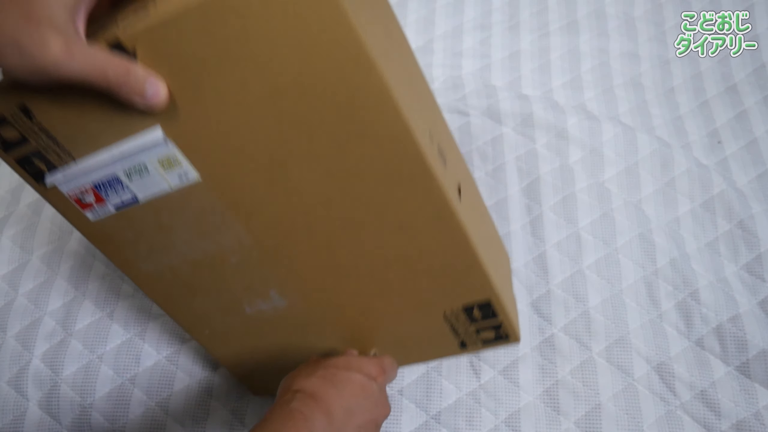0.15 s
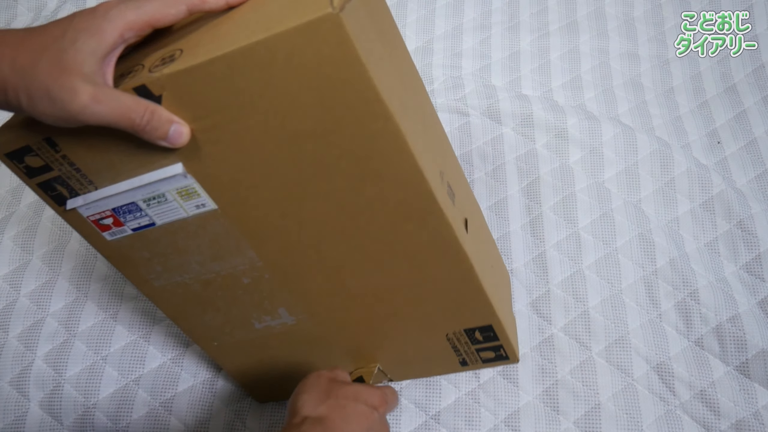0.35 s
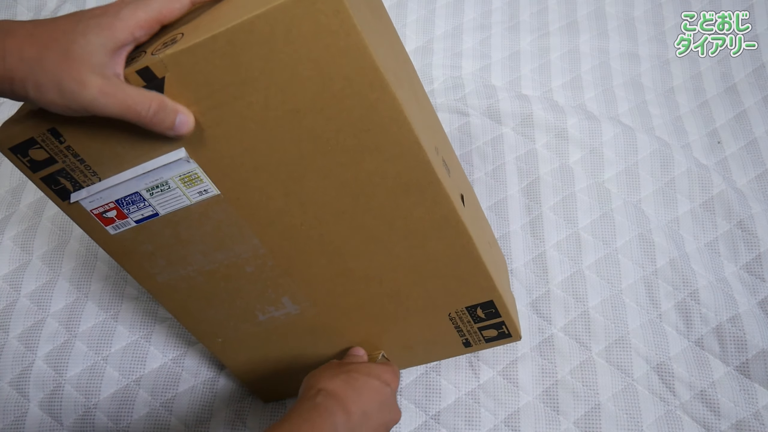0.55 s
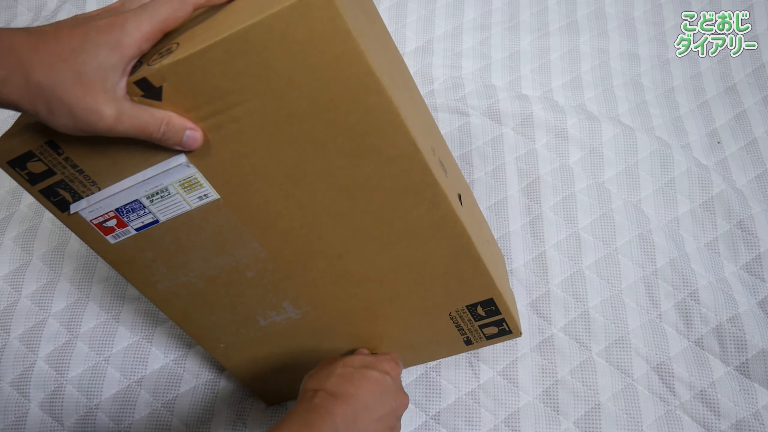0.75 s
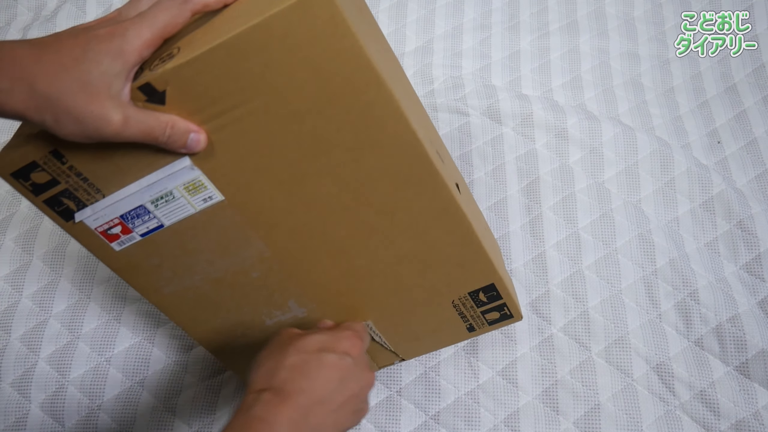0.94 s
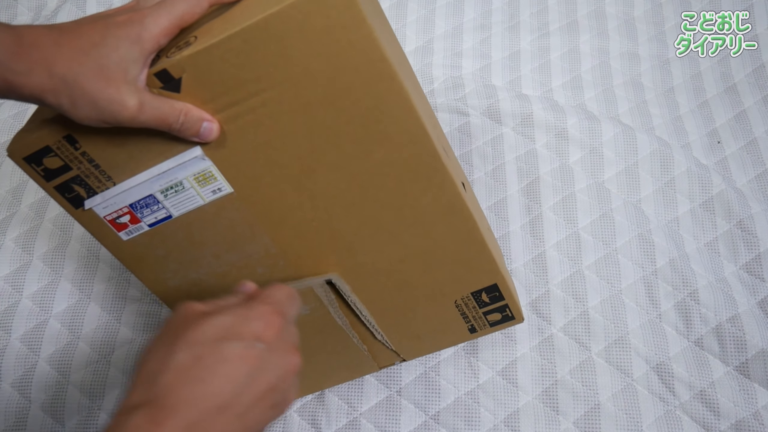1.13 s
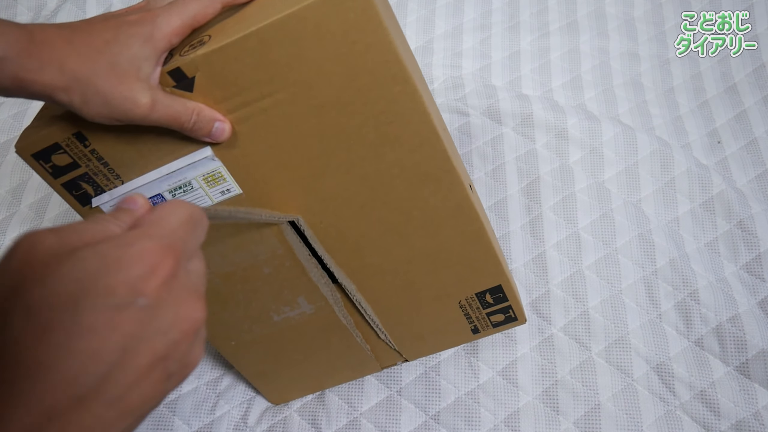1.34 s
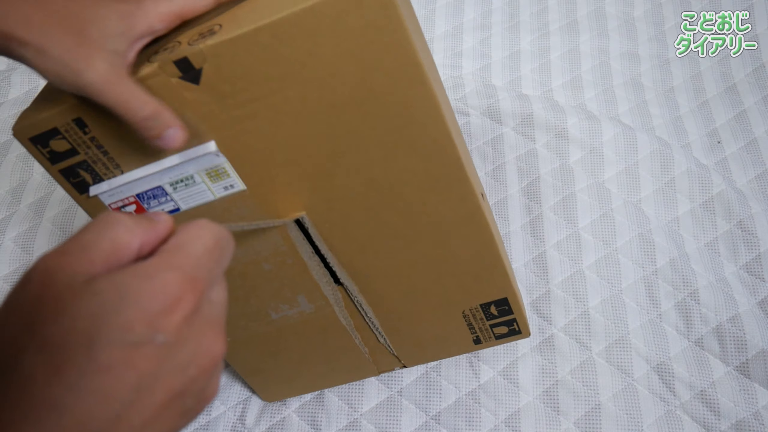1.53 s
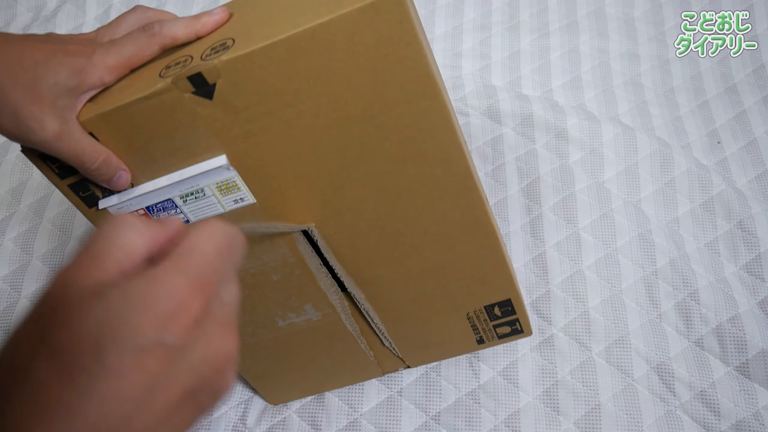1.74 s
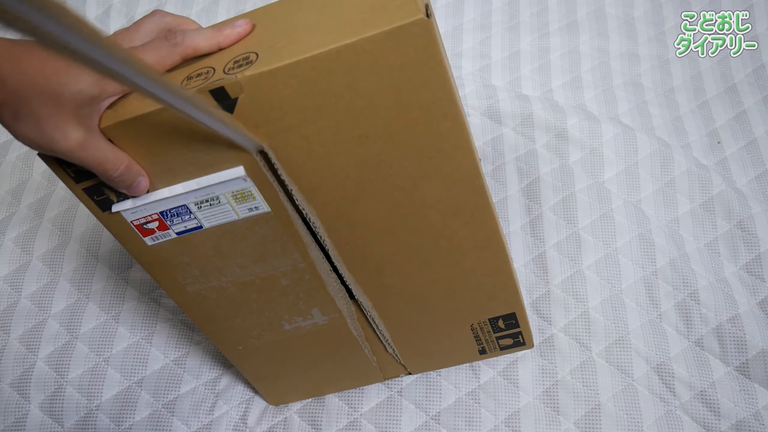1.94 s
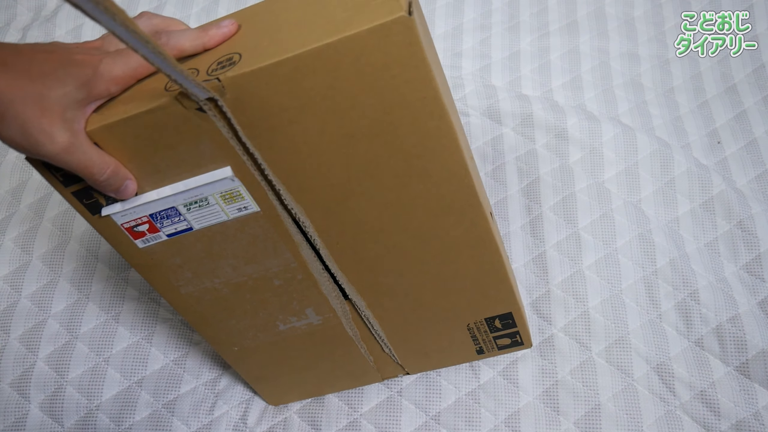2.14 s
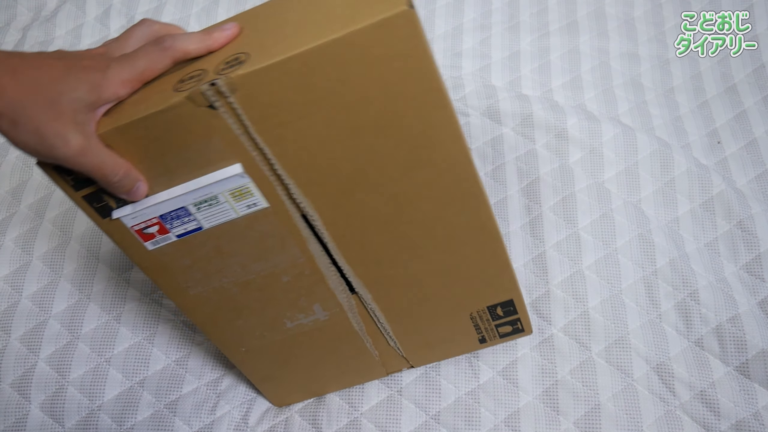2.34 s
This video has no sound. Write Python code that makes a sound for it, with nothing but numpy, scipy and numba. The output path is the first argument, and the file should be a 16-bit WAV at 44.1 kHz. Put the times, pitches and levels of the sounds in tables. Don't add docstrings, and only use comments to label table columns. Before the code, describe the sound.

Two loud ripping pulls on a cardboard box's tear strip, boomy and crackling, then a small snap

```python
import sys
import numpy as np
from scipy import signal
from scipy.fft import rfft, irfft
from scipy.io import wavfile
from scipy.ndimage import uniform_filter1d
from numba import njit

SR = 44100
rng = np.random.default_rng(int(sys.argv[2]) if len(sys.argv) > 2 else 0)


def dump_mix(stems):
    frames = np.atleast_2d(stems).T
    limited = np.clip(frames, -1, 1)
    pcm = np.round(limited * 32767).astype(np.int16)
    wavfile.write(sys.argv[1], SR, pcm)


def invert_db(x):
    u = np.asarray(x, float) / 20
    return 10 ** u


N = 109323

# f/Hz, level/dB per Hz
AIR = [(18, -20), (30, -2), (227, -27.5), (311, -27.5), (461, -23), (822, -45), (1010, -31.5), (1130, -37),
       (16000, -48)]
AIR_DB = -57.5

MOTOR_PER_S, MOTOR_START_S, MOTOR_STOP_S = 59.94, 0.0115, 0.6
MOTOR_HZ, MOTOR_DB, MOTOR_BODY_DB = 2000, -46, -50.5

# t/s, knock level/dB, brightness/dB
TAPS = [(0.033, -43, -19), (0.112, -47, -12), (0.163, -31, -14), (0.204, -30.5, -14), (0.334, -34.5, -4.5),
        (0.397, -35, 5), (0.404, -32, -2), (0.434, -37, -8.5), (0.529, -21, -7), (0.611, -33.5, -19.5),
        (0.624, -34, -8), (0.632, -27.5, -2), (0.765, -28, 11), (1.506, -43.5, -14), (2.285, -37, -4),
        (2.302, -28, 10.5)]
# t/s, level/dB, share of the box body/dB
SLIDE = [(0, -67.5, 8.5), (.13, -60.5, 2.5), (.2, -56.5, 9), (.27, -54.5, 3.5), (.3, -62.5, -4),
         (.42, -60, 3), (.5, -59, 2.5), (.56, -54, 5), (.66, -47.5, -4.5), (.7, -60.5, 8.5),
         (.76, -46, 1.5), (1.49, -69, 12), (1.53, -56, 1), (1.62, -58.5, -5.5), (1.7, -44.5, -10.5),
         (1.76, -58.5, 5), (2.22, -82, -4), (2.25, -57, -5.5), (2.47, -78.5, -8)]
# f/Hz, level/dB, t60/s
CORNER = [(367, -7, 0.05), (501, -9, 0.11), (589, 2.5, 0.043), (665, 1.5, 0.035), (782, -0.5, 0.014),
          (1177, 1.5, 0.012), (1444, -6, 0.0094)]
# f/Hz, level/dB per Hz
RUB = [(590, -39), (1000, 0.5), (1430, -15.5), (1960, -7), (6110, -7.5), (7790, -1), (16000, -9)]
TAP_DB, KNOCK_S, TICK_S, TICK_DB = 3.5, 0.00082, 0.0018, -3

# t/s, box drumming level/dB, fibre crackle level/dB, wall rattle level/dB
PULLS = [
    [(.66, -67, -58, 4), (.76, -46.5, -48.5, 0), (.767, -40.5, -36.5, 6.5), (.832, -44, -39.5, -8),
     (.843, -24, -31, -12), (1.1, -20, -32.5, -11.5), (1.25, -19.5, -41, -15), (1.34, -18, -43, -13),
     (1.405, -18, -44, -24), (1.45, -57, -47.5, 0)],
    [(1.8, -64, -57, -12), (1.815, -18, -34.5, -14), (1.85, -17, -35.5, -13), (1.92, -17.5, -36, -12.5),
     (2.0, -16, -41, -22), (2.06, -22, -39, -20), (2.09, -19.5, -35, -12.5), (2.15, -36, -40, -7),
     (2.19, -46, -71, -27)],
    [(2.276, -44.5, -46.5, -28), (2.288, -32.5, -32, 0), (2.308, -27, -26.5, -2), (2.33, -38, -46.5, -14),
     (2.385, -68, -63.5, -9)],
]
# t/s, thump level/dB
FLUTES = [(0.864, -7.5), (0.913, -4), (0.959, -7.5), (0.993, -5), (1.036, -11.5), (1.064, -7), (1.095, -13),
          (1.119, -2.5), (1.163, -1.5), (1.21, -1.5), (1.224, -3), (1.262, -0.5), (1.303, -8),
          (1.315, -1.5), (1.349, -3.5), (1.367, -4.5), (1.814, -5.5), (1.836, -0.5), (1.862, -0.5),
          (1.885, -21), (1.902, -4.5), (1.927, -32), (1.964, -10.5), (1.982, -18), (2.008, -9.5),
          (2.032, -12), (2.069, -7), (2.092, -12), (2.138, -38), (2.295, -19.5)]
# t/s, thump level/dB
BUMPS = [
    (.638, -30.5),
    (0.762, -24.5),
    (1.436, -30),
    (1.524, -33.5),
    (1.582, -35.5),
    (1.742, -28.5),
    (2.15, -26.5),
    (2.2, -35.5),
    (2.288, -23.5),
]
# t/s, lid pitch f/Hz, boom of the box air level/dB
SLIT = [(.6, 200, -1), (.86, 194, -2.5), (1.0, 196.6, -2), (1.079, 188, -4), (1.13, 208, -3),
        (1.22, 198, -9.5), (1.27, 213.7, -15), (1.33, 234.3, -22), (1.4, 199.3, -10), (1.81, 178, -5.5),
        (1.845, 203.3, -19), (1.91, 233.7, -18.5), (1.95, 223.6, -16.5), (2.0, 191, -21), (2.04, 212, -17),
        (2.08, 221.5, -10.5), (2.16, 194.4, -1), (2.3, 198.4, -9)]
# f/Hz, level/dB, t60/s
BOX_AIR = [(73.7, -2.5, 0.31), (114, -7, 0.19), (139, 7, 0.12), (194, -10.5, 0.21)]
# f/Hz, level/dB, t60/s
LID = [(209.5, 1, 0.12), (246.5, -10.5, 0.14), (295.7, -22, 0.17)]
# f/Hz, level/dB, t60/s
WALLS = [(489.6, -1, 0.081), (534, -7, 0.047), (600, -5.5, 0.042), (688, -7, 0.045), (805, -4.5, 0.022),
         (1054, -4, 0.03), (1190, -5, 0.026), (1600, -4, 0.0071)]
# t/s, level/dB
SLAPS = [(0.775, -23), (0.866, -22), (0.886, -30), (0.916, -24), (0.929, -28), (0.948, -29), (0.962, -25.5),
         (0.984, -25), (1.028, -32), (1.058, -34), (1.064, -26.5), (1.093, -22.5), (1.115, -17),
         (1.139, -29), (1.149, -29), (1.158, -26), (1.192, -39), (1.228, -27.5), (1.272, -25), (1.297, -45),
         (1.318, -21), (1.348, -17), (1.366, -26), (1.4, -32), (1.815, -29.5), (1.84, -18.5), (1.893, -29),
         (1.92, -24), (1.957, -30), (1.986, -30), (2.003, -37), (2.013, -33), (2.032, -30), (2.039, -39.5),
         (2.059, -24.5), (2.087, -29), (2.11, -33), (2.125, -46), (2.132, -31), (2.305, -27)]
LID_REST_HZ, LID_LOW_HZ, SLACK_DAMPING = 210, 104, 3.5
PUSH_S, THUMP_DB = 0.0041, -3.5
SMALL_PER_S, SMALL_SCATTER_DB, SMALL_PUSH_S, SMALL_DB = 670, 4.5, 0.0021, -6
RATTLE_PER_S, WALL_PATCHY_DB, WALL_DRIFT = 310, 2.0, 0.039
SLAP_DB, SLAP_S = -7.5, 0.00049

# t/s, peak level/dB
TICKS = [(0.8521, -17.5), (0.8651, -21), (0.9031, -15), (0.9167, -22.5), (0.927, -23), (0.9499, -18.5),
         (0.9739, -25), (0.9878, -19.5), (0.9965, -28), (1.0277, -18), (1.065, -18), (1.0939, -27),
         (1.1087, -20), (1.1395, -28), (1.1603, -27), (1.168, -31.5), (1.183, -28), (1.1956, -30),
         (1.2094, -32), (1.2235, -31.5), (1.2506, -31), (1.2617, -35), (1.2664, -37.5), (1.291, -34),
         (1.3076, -35), (1.3166, -37), (1.3261, -33), (1.3358, -33), (1.343, -37), (1.3516, -29.5),
         (1.3629, -33.5), (1.3754, -30.5), (1.382, -42), (1.4008, -33.5), (1.4188, -41), (1.8161, -19),
         (1.8377, -20.5), (1.858, -29), (1.867, -30), (1.8903, -40), (1.8984, -29), (1.921, -25),
         (1.9414, -35.5), (1.9656, -28.5), (1.9752, -28), (1.988, -31), (2.0033, -39), (2.0157, -33),
         (2.0258, -40), (2.0328, -43), (2.0455, -42), (2.0795, -28), (2.0883, -32), (2.0982, -30.5),
         (2.111, -34), (2.132, -33), (2.2895, -28), (2.307, -27.5)]
# t/s, dull part level/dB, bright part level/dB
SNAPS = [
    (0.6118, -23.5, -36),
    (0.635, -20.5, -33),
    (0.7627, -23.5, -38),
    (1.7933, -30.5, -40),
    (2.241, -56.5, -39),
    (2.2571, -42, -24.5),
    (2.3715, -43.5, -52),
]
# f/Hz, level/dB per Hz
FIBRE = [(820, -13), (1400, -3), (2300, -6.5), (4140, -4), (7020, -3.5), (8770, -0.5), (10600, -4.5),
         (12500, -3.5), (15800, -12.5)]
FIBRES_PER_S, FIBRE_SCATTER_DB, FIBRE_DB, FLICKER_DB = 11000, 2.5, -2, 2
PATCHY_DB, FIBRE_LOW_DB_OCT = 2.2, 3.0
PART_S, PART_TAIL_S, PART_DB = 0.0018, 0.0016, -2.0
SKIRT_S, SKIRT_DB = 0.0098, 38.5
SNAP_S, SNAP_RISE_S, SNAP_DB, BRIGHT_HZ = 0.0028, 0.0016, -10, 8000

ROOM_T60_S, ROOM_DB = 0.11, -10.5
LAG_S, LEFT_DB, LEFT_TOP_DB = -1.5e-5, 0.8, -2.5
SPREAD_DB, WIDE_HZ, RUMBLE_SIDE_DB = -3, 2600, -10.5
MIC_LOW_HZ, TOP_HZ = 59, 15800


def unit(x):
    return x / np.sqrt(np.mean(x ** 2))


def rms(x):
    return np.sqrt(np.mean(x ** 2))


def track(rows, col, off=None):
    rows = np.array(rows)
    return np.interp(np.arange(N) / SR, rows[:, 0], rows[:, col], left=off, right=off)


def curve(rows, col):
    return invert_db(track(rows, col, -120.0))


def colour(x, points, low_db_oct=-2.0):
    f = np.maximum(np.fft.rfftfreq(N, 1 / SR), 1)
    hz, db = np.array(points).T
    octaves_below = np.minimum(np.log2(f / hz[0]), 0)
    gain = invert_db(np.interp(np.log(f), np.log(hz), db) + low_db_oct * octaves_below)
    return irfft(rfft(x) * unit(gain), N)


def butter(x, order, hz, kind):
    return signal.sosfilt(signal.butter(order, hz, kind, fs=SR, output="sos"), x)


def ring(x, modes):
    t = np.arange(SR // 2) / SR
    h = np.zeros(len(t))
    for hz, db, t60 in modes:
        h += invert_db(db) * np.exp(-np.log(1000) * t / t60) * np.sin(2 * np.pi * hz * t)
    return signal.fftconvolve(x, h / np.abs(h).max())[:N]


@njit
def bend(x, hz, keep):
    y, z = np.empty(len(x)), 0j
    for i in range(len(x)):
        z = z * keep[i] * np.exp(2j * np.pi * hz[i] / SR) + x[i]
        y[i] = z.imag
    return y


def decay(t60):
    return np.exp(-np.log(1000) / (t60 * SR))


def spikes(times, dbs):
    x = np.zeros(N)
    at = np.clip((np.asarray(times) * SR).astype(int), 0, N - 1)
    np.add.at(x, at, invert_db(np.asarray(dbs)))
    return x


def soften(x, seconds):
    w = np.sin(np.pi * np.clip(np.arange(800) / SR / seconds, 0, 1)) ** 2
    return np.convolve(x, w / w.sum())[:N]


def burst(x, seconds):
    return signal.lfilter([1], [1, -np.exp(-1 / (seconds * SR))], x)


def crackle(per_s, scatter_db):
    chance, sign, draw = rng.random((3, N))
    size = np.minimum(-np.log(1 - draw), 4)
    return unit((chance < per_s / SR) * np.sign(sign - 0.5) * invert_db(scatter_db * size))


def walk(rate):
    k = int(SR / rate)
    held = np.repeat(rng.standard_normal(N // k + 1), k)
    return unit(uniform_filter1d(held, k)[:N])


def room_air():
    return [invert_db(AIR_DB) * colour(rng.standard_normal(N), AIR) for _ in range(2)]


def room(near):
    t = np.arange(SR // 2) / SR
    tails = rng.standard_normal((2, len(t))) * invert_db(-60 * t / ROOM_T60_S) * (t > 0.004)
    bright = butter(near, 1, 500, "high")
    wet = [signal.fftconvolve(bright, h / np.sqrt(np.sum(h ** 2)))[:N] for h in tails]
    return invert_db(ROOM_DB) * np.array(wet)


def motor():
    t = np.arange(MOTOR_START_S, MOTOR_STOP_S, 1 / MOTOR_PER_S)
    weak_db = -7.0 * (np.arange(len(t)) % 2)
    steps = spikes(t, 2.5 * rng.standard_normal(len(t)) + weak_db)
    shell = ring(soften(steps, 0.00057), [(MOTOR_HZ, 0, 0.025)])
    shell = butter(shell, 2, [1700, 2300], "band")
    body = ring(soften(steps, 0.00093), [(615, 0, 0.053)])
    return shell * invert_db(MOTOR_DB) + body * invert_db(MOTOR_BODY_DB)


def fingers():
    t, db, bright_db = np.array(TAPS).T
    hits = spikes(t, db + TAP_DB)
    scuff = burst(hits, 0.009) * rng.standard_normal(N) * invert_db(-25.5)
    knock = butter(ring(soften(hits, KNOCK_S) + scuff, CORNER), 2, 400, "high")

    slide = curve(SLIDE, 1) * invert_db(1.0 * walk(41.3))
    stir = ring(crackle(900, 1.0), CORNER) + invert_db(-10.0) * ring(crackle(710, 5.0), LID)
    stir = unit(stir) * slide * curve(SLIDE, 2)

    tick_env = burst(spikes(t, db + bright_db + TICK_DB), TICK_S)
    surface = []
    for _ in range(2):
        tick = colour(tick_env * rng.standard_normal(N), FIBRE, low_db_oct=7.0)
        rub = slide * colour(crackle(11000, 1.7), RUB, low_db_oct=7.5)
        surface.append(tick + rub)
    return knock + stir, surface


def walls():
    shake = sum(curve(p, 1) * curve(p, 3) for p in PULLS) / np.sqrt(SR / 100)
    t, level_db = np.array(SLAPS).T
    out = np.zeros(N)
    for hz, db, t60 in WALLS:
        rattle = shake * invert_db(WALL_PATCHY_DB * walk(14)) * crackle(RATTLE_PER_S, 4.7)
        share_db = 4.2 * rng.standard_normal(len(t))
        slap = soften(spikes(t, level_db + SLAP_DB + share_db), SLAP_S)
        pitch = hz * (1 + WALL_DRIFT * walk(7))
        out += invert_db(db) * bend(rattle + slap, pitch, np.full(N, decay(t60)))
    return out


def lid(x):
    pitch = track(SLIT, 1) / LID_REST_HZ
    out = np.zeros(N)
    for hz, db, t60 in LID:
        out += invert_db(db) * bend(x, hz * pitch, decay(t60 * pitch ** SLACK_DAMPING))
    return butter(out, 2, LID_LOW_HZ, "high")


def box():
    boom = invert_db(track(SLIT, 2))

    def body(x):
        return ring(x * boom, BOX_AIR) + lid(x)

    small = soften(crackle(SMALL_PER_S, SMALL_SCATTER_DB), SMALL_PUSH_S)
    drum = small / rms(body(small)) * invert_db(SMALL_DB) * sum(curve(p, 1) for p in PULLS)
    thumps = invert_db(THUMP_DB) * soften(spikes(*np.array(FLUTES + BUMPS).T), PUSH_S)
    return body(drum - thumps) + walls()


def patchy_crackle():
    edges = [300, 2000, 4000, 6500, 10000, 18000]
    out = np.zeros(N)
    for band in zip(edges, edges[1:]):
        clicks = butter(crackle(FIBRES_PER_S, FIBRE_SCATTER_DB), 2, band, "band")
        out += invert_db(PATCHY_DB * walk(150)) * clicks
    return unit(out)


def snap(t, db):
    return invert_db(SNAP_DB) * soften(burst(spikes(t, db), SNAP_S), SNAP_RISE_S)


def fibres():
    tear = invert_db(FIBRE_DB + FLICKER_DB * walk(90)) * sum(curve(p, 2) for p in PULLS)
    t, peak_db = np.array(TICKS).T
    part = soften(burst(spikes(t - PART_S * 0.72, peak_db + PART_DB), PART_TAIL_S), PART_S)
    skirt = soften(soften(spikes(t - SKIRT_S, peak_db + SKIRT_DB), SKIRT_S), SKIRT_S)
    env = np.hypot(np.hypot(tear, part), skirt)

    t, dull_db, bright_db = np.array(SNAPS).T
    env = env + snap(t, dull_db)
    bright = snap(t, bright_db)
    out = []
    for _ in range(2):
        paper = colour(env * patchy_crackle(), FIBRE, low_db_oct=FIBRE_LOW_DB_OCT)
        thin = butter(bright * rng.standard_normal(N), 4, BRIGHT_HZ, "high")
        out.append(paper + thin)
    return out


def ports(x, other):
    f = np.fft.rfftfreq(N, 1 / SR)
    width = f / np.hypot(f, WIDE_HZ) + invert_db(RUMBLE_SIDE_DB)
    side = irfft(rfft(other) * width, N) * invert_db(SPREAD_DB)
    left = rfft(x) * np.exp(-2j * np.pi * f * LAG_S) + rfft(side)
    left = left * invert_db(LEFT_DB + LEFT_TOP_DB * (f > 7000))
    return np.array([irfft(left, N), x - side])


def scene():
    air = room_air()
    hand, rub = fingers()
    tear = fibres()
    near = box() + tear[0] + hand + rub[0]
    direct = ports(near + air[0] + motor(), tear[1] + rub[1] + air[1])
    return direct + room(near)


def low_pass(x):
    return signal.sosfilt(signal.butter(12, 16600, fs=SR, output="sos"), x)


def record(dry):
    mix = signal.sosfilt(signal.ellip(8, 0.3, 55, TOP_HZ, fs=SR, output="sos"), dry)
    mix = butter(mix, 3, MIC_LOW_HZ, "high")
    return low_pass(mix)


dry = scene()
out = record(dry)
dump_mix(out)
```